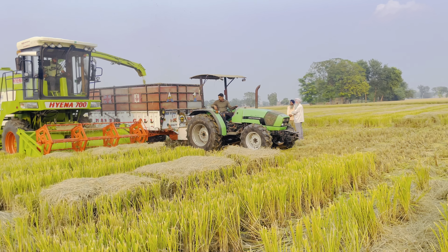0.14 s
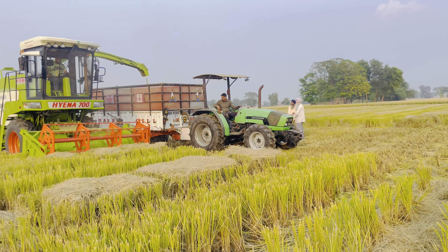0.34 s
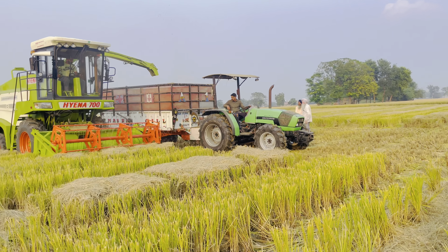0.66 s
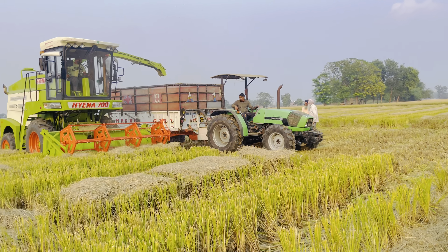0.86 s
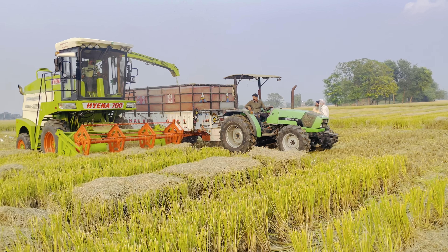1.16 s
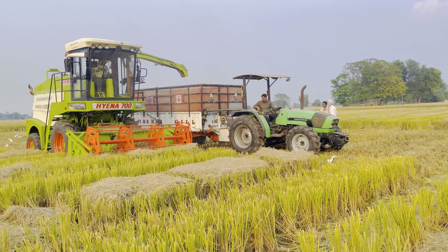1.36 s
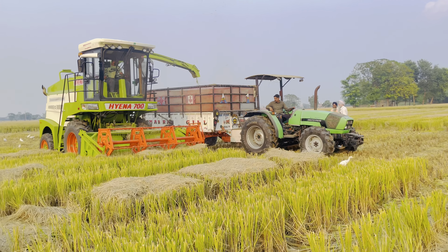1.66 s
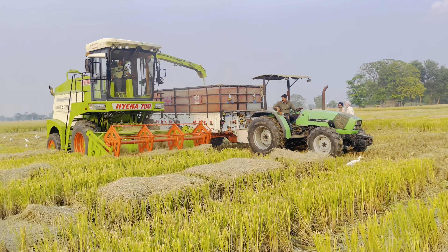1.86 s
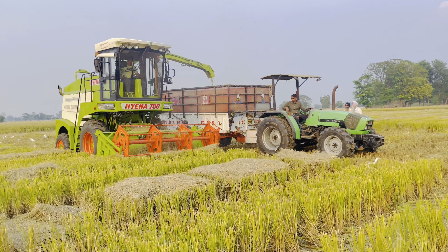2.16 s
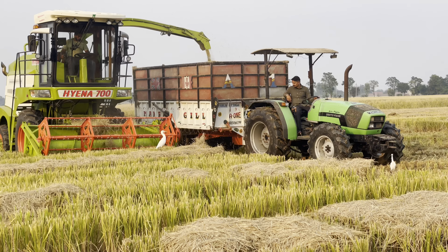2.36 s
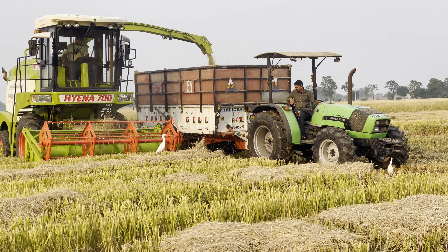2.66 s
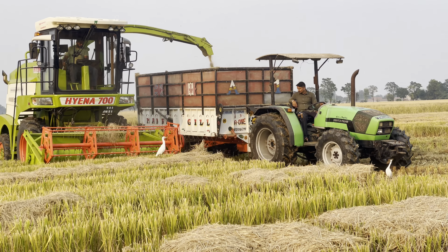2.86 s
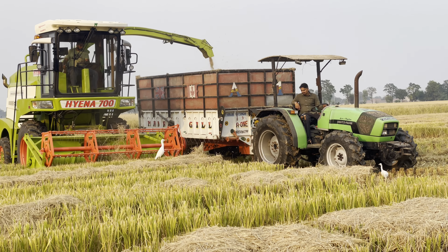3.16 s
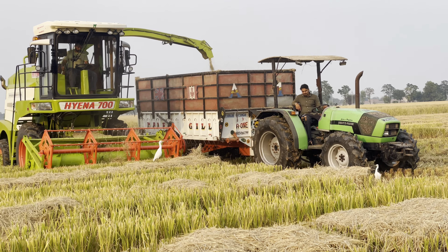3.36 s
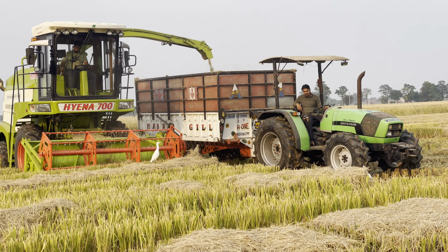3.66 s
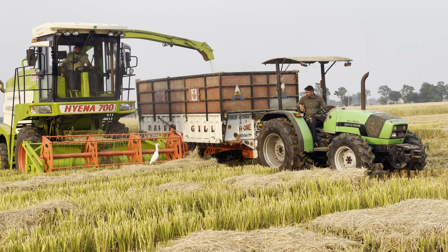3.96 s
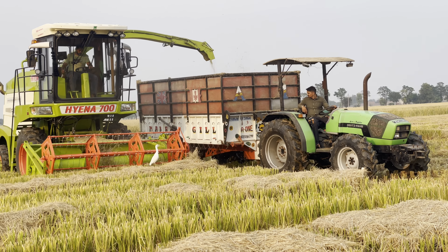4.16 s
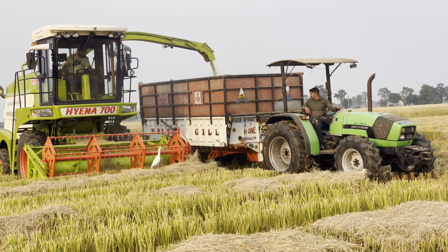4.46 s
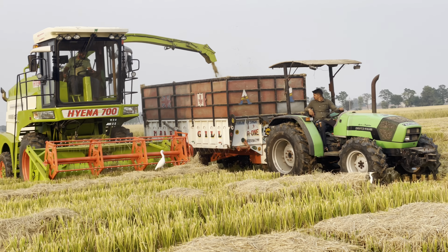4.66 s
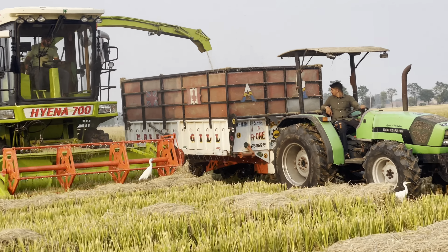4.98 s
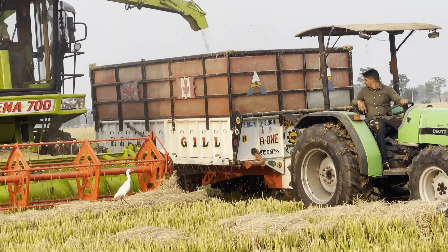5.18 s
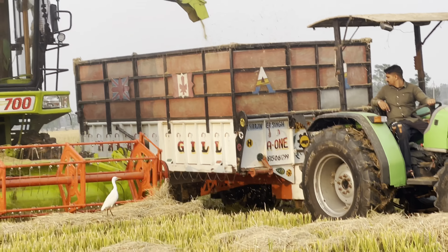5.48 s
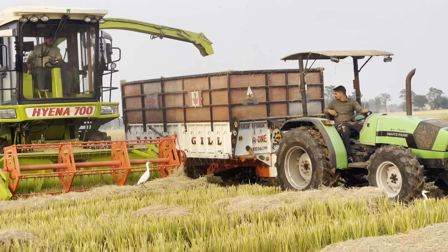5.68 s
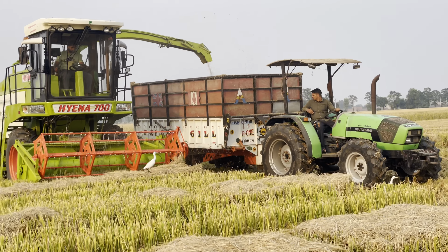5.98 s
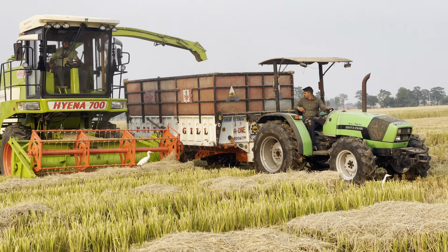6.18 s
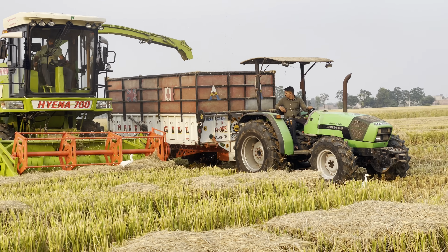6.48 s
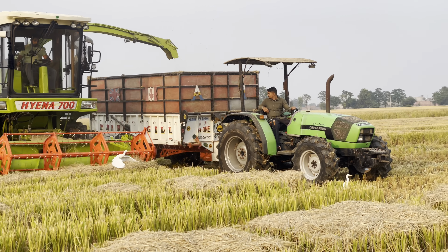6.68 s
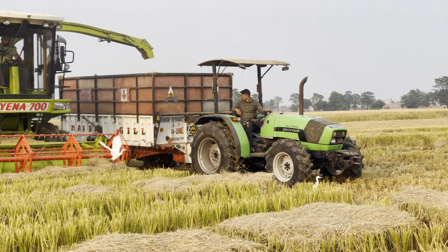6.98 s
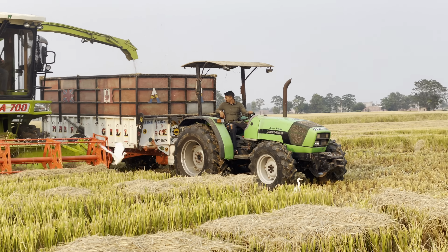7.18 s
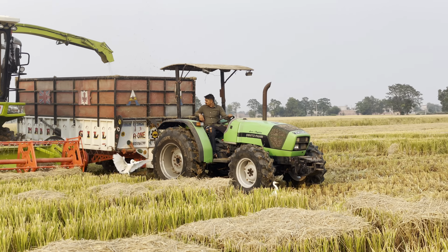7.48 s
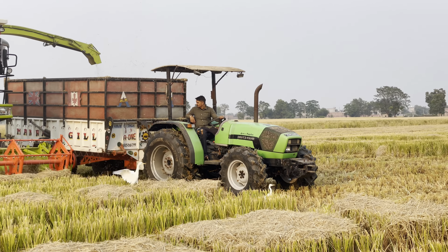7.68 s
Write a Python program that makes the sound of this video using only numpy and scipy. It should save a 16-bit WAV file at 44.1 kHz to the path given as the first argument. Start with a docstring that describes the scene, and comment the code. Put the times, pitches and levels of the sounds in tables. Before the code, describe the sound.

A forage harvester and tractor roar steadily in a field, humming and hissing with chopped straw, then jump nearer after about two seconds.

```python
"""A dense, humming, hissing roar: a forage harvester chops rice straw into a trailer that a tractor pulls.
One diesel drives chopper drum and fan, so their hums, sums of sines on one crank angle, rise and sag together.
Exhaust rumble, machine roar and rattle, and straw hiss are bands of shaped noise that throb, clump and swell.
At 2.34 s the listening place jumps nearer and more head-on; the sound starts low, then rises within 20 ms.
The machines then roll past."""
import sys
import numpy as np
from scipy import signal
from scipy.fft import rfft, irfft, next_fast_len
from scipy.io import wavfile
from scipy.ndimage import map_coordinates

SR = 44100
rng = np.random.default_rng(int(sys.argv[2]) if len(sys.argv) > 2 else 0)


def dump(signal):
    """Clip the signal to [-1, 1] and save it as 16-bit WAV at the path in sys.argv[1]."""
    limited = np.clip(np.atleast_2d(signal).T, -1, 1)
    pcm = np.round(limited * 32767).astype(np.int16)
    wavfile.write(sys.argv[1], SR, pcm)


N = 345303

# Engine speed, sagging under load and recovering. Each row: time in seconds, crank turns per second.
CRANK_SPEED = [(0, 34.09), (0.9, 34.21), (2.33, 34.21), (2.37, 33.82), (2.55, 33.85), (2.9, 34.0),
               (3.2, 34.0), (3.7, 34.19), (4.25, 34.14), (4.5, 34.07), (5.5, 34.04), (7.1, 34.38),
               (7.83, 34.36)]
# Steady partials of drum, fan and engine. Each row: multiple of the knife, blade or crank rate,
# level in dB from afar, level in dB approaching the near place, level in dB abreast of it.
DRUM_PARTIALS = [(3, -33.5, -39, -39), (5, -38, -35.5, -36.5), (6, -49, -50, -47), (7, -44, -45, -44),
                 (8, -49, -48, -48)]
FAN_PARTIALS = [(1, -28.5, -26.5, -27.5), (1.5, -40, -38.5, -45), (2, -40.5, -35.5, -29.5),
                (3, -47, -46, -42)]
ENGINE_PARTIALS = [(1, -45, -44, -43), (2, -41, -41, -40), (3, -38, -35, -33.5), (4, -36, -33, -34.5),
                   (20, -44, -38, -37.5), (27, -45, -46, -49), (28, -43, -44, -47), (29, -41, -47, -46),
                   (30, -40.5, -38, -37), (32, -49, -50, -46), (33, -52, -48, -45), (44, -51, -47, -45)]
# Whines of gears, belts and chains. Each row: multiple of the crank rate,
# level in dB from afar, level in dB approaching, level in dB abreast.
GEAR_WHINES = [(29.21, -49, -40, -45), (36.4, -49, -46, -41), (37.68, -48, -45, -48),
               (40.44, -48, -46, -45), (54.1, -52, -54, -46.5), (59.1, -54, -45.5, -53),
               (61.1, -50, -45.5, -53), (73.8, -57, -49, -48), (90.65, -62, -51, -49.5),
               (94.6, -52, -47, -45.5), (95.9, -52, -48, -47.5), (96.75, -62, -56, -46),
               (98.75, -58, -49, -47.5), (101.95, -55, -46, -46.5)]
# The leading hums: the drum's low thrum that comes and goes (once the knife rate), its main hum (twice),
# the whine an octave above that, and the diesel's strongest hum (ten times the crank rate).
# Each row: time in seconds, level in dB.
DRUM_THRUM = [(0, -41), (1.35, -39), (1.7, -26), (2.05, -28), (2.35, -30), (2.95, -39), (3.3, -33),
              (3.6, -32), (4.0, -35), (4.5, -39), (4.75, -35), (5.1, -25), (5.45, -25), (5.75, -28),
              (6.35, -27.5), (6.7, -21.5), (7.0, -24.5), (7.3, -38), (7.55, -28), (7.83, -34)]
DRUM_MAIN_HUM = [(0, -24.5), (0.4, -22.5), (0.55, -25.5), (0.8, -22.7), (1.27, -22.5), (1.43, -25),
                 (1.6, -22), (2.2, -22), (2.38, -27.5), (2.6, -22), (2.95, -26), (3.45, -24.5),
                 (4.0, -26.5), (4.4, -23.5), (4.75, -20.5), (4.95, -23), (5.25, -20.5), (5.6, -19),
                 (6.1, -19), (6.9, -22), (7.1, -26), (7.3, -21), (7.5, -23.5), (7.8, -20.5)]
DRUM_WHINE = [(0, -31), (0.6, -35.5), (1.6, -32), (1.9, -29), (2.28, -29), (2.42, -37), (3.1, -36),
              (3.6, -32), (4.3, -33.5), (4.85, -36), (5.15, -33), (5.45, -34.5), (5.9, -30.5), (6.2, -32.5),
              (6.6, -28.5), (7.05, -29), (7.25, -26.5), (7.8, -28)]
DIESEL_HUM = [(0, -41), (0.7, -35), (1.1, -41), (1.5, -35), (1.9, -38), (2.17, -27), (2.45, -33.5),
              (3.4, -25.5), (3.65, -29), (4.0, -28.5), (5.1, -30), (5.6, -26), (6.1, -28), (7.0, -24.5),
              (7.4, -24.5), (7.8, -29)]
# Exhaust boom, swelling as the engines take up load. Each row: time in seconds, level in dB.
EXHAUST_BOOM = [(0, -18), (0.35, -22), (0.7, -19.5), (1.0, -20.5), (1.55, -20.5), (2.05, -19),
                (2.45, -21.5), (2.9, -21), (3.35, -17.5), (3.85, -17.5), (4.03, -22), (4.5, -17),
                (4.8, -20), (5.1, -18), (5.5, -17), (5.95, -18), (6.3, -21), (6.6, -21), (7.25, -17.5),
                (7.75, -20)]
# Drone of the bodywork above the boom: level in dB from afar, approaching, abreast.
BODY_DRONE = (-21, -19.5, -19)
# Broad colour of the noise. Each row: frequency in Hz, far density in dB per Hz, near density in dB per Hz
# (only relative within a band: each band is levelled afterwards).
TIMBRE = [(22, -34.2, -32.9), (40, -15, -14.5), (70.5, -12.5, -5.5), (134, -1.5, 0.0), (250, -6, -6),
          (376, -12, -12), (474, -18.5, -16), (984, -20.5, -19.5), (1550, -25, -28.5), (2700, -30.5, -34),
          (4330, -31, -29), (7300, -39, -33.5), (11180, -38, -36), (15100, -57.5, -52.5)]
# Resonances of housing and spout. Each row: centre in Hz, width in Hz, far boost in dB, near boost in dB.
HOUSING = [(556, 42, 1.5, 4), (732, 205, 6, 2.5), (955, 167, 9, 6.5), (1300, 250, 7, 7),
           (1494, 45, 8.5, 4.5), (1936, 760, 6, 10), (2610, 390, 3, 7), (3225, 930, 10, 11.5),
           (2520, 160, -0.5, 2.5), (3670, 94, 2, 1.5), (4160, 150, 4, 0), (5050, 210, 7.5, 0.6),
           (5940, 180, 4.5, -0.5), (6500, 400, 5.5, 2.5), (6870, 180, 4, 1), (9880, 140, 11, 8)]
# Bands that the ground reflection cancels. Each row: centre in Hz, width in Hz, far gain in dB, near gain in dB.
GROUND_DIPS = [(82.4, 16, -1, -3.5), (197, 9, -9, -1), (630, 39, -2, 0), (1150, 95, -3, -3),
               (1590, 81, 0, -1), (2360, 140, -0.5, -1), (3070, 130, -0.5, -1.5), (5500, 310, -8, 0)]
# How the sound spreads over left and right in each listening place. Each row: frequency in Hz, left over right
# in dB, lead of the left in radians, likeness of the two # sides from 0 to 1.
STEREO_FAR = [(34, 1.3, 0.1, 1), (200, 3, 0.3, 1), (378, -1.3, 0.44, 1), (450, -6, 1.2, 0.92),
              (584, 5, 2.38, 0.93), (693, 15, 4.3, 0.83), (930, 3, 7.4, 0.95), (1100, -0.5, 8.3, 0.8),
              (1350, 12, 10.6, 0.17), (1540, -4, 8.9, 0.66), (1820, 0, 11.6, 0.67), (2050, 5, 13.4, 0.3),
              (2460, -6, 18.2, 0.56), (2590, -0.5, 20.9, 0.9), (3450, 4.5, 22.4, 0.62),
              (3820, 3.5, 26.5, 0.17), (5000, 5.5, 31.7, 0.36), (5800, 5.5, 32.9, 0.2), (7900, 3, 35, 0.05),
              (9400, 0, 34.6, 1), (10500, 0, 33.5, 0.76), (12600, 0, 31.5, 1)]
STEREO_NEAR = [(34, 0.7, 0.05, 0.98), (200, 1.65, 0.15, 0.99), (397, 0.3, 0.26, 0.98), (510, 0.5, 1, 0.94),
               (610, 5.5, 0.6, 1), (690, 8, 0.3, 0.97), (900, 3.2, 0.4, 0.98), (1040, 4, 0.8, 0.97),
               (1140, 7, 0.1, 0.87), (1300, 2, 0.23, 0.99), (1600, 3.5, 0, 0.95), (1850, -0.5, 0, 1),
               (2320, 0, 0.12, 0.99), (2900, 0.2, 0.66, 0.95), (5300, 0, 0.5, 0.9),
               (5660, -0.5, -1.5, 0.82), (6600, 0.5, -0.55, 0.8), (8680, -1, -3, 1),
               (12000, 0.5, -5.2, 0.8), (13000, 0, -7, 1)]
# Steady flow of crop, heard as roar and as hiss: level in dB from afar, approaching, abreast.
ROAR_FLOW = (-26, -24.5, -24.5)
HISS_FLOW = (-36.5, -34.5, -34)
# Uneven flow of crop: most rows swell roar and hiss; the first swells the hiss while the roar sinks,
# and at 2.64 s a thin patch lets only the hiss sink.
# Each row: middle in seconds, half length in seconds, change of roar in dB, change of hiss in dB.
WADS = [(0.015, 0.033, -1.5, 4.5), (2.455, 0.14, 3, 0.5), (2.64, 0.053, 0.3, -2), (2.85, 0.035, 1, 1),
        (3.6, 0.03, 0.5, 0), (3.95, 0.05, 1.5, 1.5), (3.11, 0.11, 2, 1.5), (4.424, 0.084, 1.8, 1),
        (4.477, 0.036, 5, 4), (5.6, .14, 2, 1.5), (7.197, .16, 1, 2), (7.564, 0.088, 1, 1.5)]
# Finest spray of chaff, the top treble. Each row: time in seconds, level in dB against the rest of the hiss.
SPRAY = [(0, -2), (0.25, -1.5), (1.1, 0.5), (1.6, 1), (2.18, -1), (2.3, 1.5), (2.6, -1), (3.4, 0),
         (4.4, 0.5), (5.14, -2), (5.9, -2), (6.3, -0.5), (7.0, 0.5), (7.4, 1), (7.83, 1)]
# Hard stalks that tick against the spout. Each row: start in seconds, level in dB over the finest spray.
STALKS = [(.119, 6), (.437, 5), (.518, 9.5), (.614, 7), (1.037, 7), (1.095, 8), (3.477, 5), (5.126, 3),
          (6.620, 8.5)]
# Lumps that knock through the chopper housing. Each row: start in seconds, decay in seconds,
# level in dB over the rattle, level in dB over the hiss.
KNOCKS = [(1.943, .011, 0, -20), (2.838, .028, 0.5, -14), (3.210, .012, 2, -20), (3.417, .01, -0.5, -20),
          (3.583, .018, 0.5, -16), (4.111, .009, 0, -20), (4.423, .012, -7, -7), (4.453, .014, -5, -7),
          (4.476, .018, -4, -7), (4.502, .016, -2, -8), (4.679, .01, 1, -20), (5.126, .032, -16, 4.5),
          (6.714, .01, -4, -20)]

KNIVES_PER_TURN, BLADES_PER_TURN = 5.4986, 8.1471   # per crank turn
ABREAST_S, PASSING_S = 4.8, 1   # when the machines come abreast of the near place, and how gradually
JUMP_S, HOLD_S, RISE_S, START_GAIN = 2.343, 0.007, 0.011, 0.38   # jump to the near place, and its low start


def from_db(db):
    """Decibels to gain."""
    return 10 ** (np.asarray(db) / 20)


def rms(x):
    """Root mean square."""
    return np.sqrt(np.mean(x ** 2) + 1e-20)


def seconds():
    """Time of every sample."""
    return np.arange(N) / SR


def in_time(rows):
    """A (time, value) curve, one value a sample."""
    s, values = np.transpose(rows)
    return np.interp(seconds(), s, values)


def at_hz(points, hz, axis):
    """One column of a spectrum, read on a log-frequency axis."""
    points = np.array(points, float)
    return np.interp(np.log(hz), np.log(np.maximum(points[:, 0], 1)), points[:, axis])


def bins():
    """Frequency in Hz of every bin of the filter grid."""
    size = next_fast_len(N, True)
    return np.maximum(np.arange(size // 2 + 1) * SR / size, 1)


def filtered(x, response):
    """Pass x through a frequency response."""
    size = next_fast_len(N, True)
    return irfft(rfft(x, size) * response, size)[..., :N]


def low_share(edge_hz):
    """Steep low-pass response whose gain is one half at the edge."""
    return 1 / (1 + (bins() / edge_hz) ** 12)


def crossover(x, edge_hz):
    """The parts of a sound below and above a frequency."""
    low = filtered(x, low_share(edge_hz))
    return low, x - low


def drift(rate):
    """Slow random wander of rms 1 that changes about rate times a second."""
    step = 40   # samples between the points that are drawn
    r = np.exp(-2 * np.pi * rate * step / SR)
    settle = 2000   # first points, dropped while the filter settles
    noise = rng.standard_normal(N // step + settle + 2)
    slow = signal.lfilter([1], [1, -2 * r, r * r], noise)[settle:]
    return np.interp(np.arange(N) / step, np.arange(len(slow)), slow / rms(slow))


def approach(far_db, near_db, abreast_db):
    """Level of a source: steady from afar, then easing to a new level as the machines come abreast."""
    t = seconds()
    passed = .5 + .5 * np.tanh((t - ABREAST_S) / PASSING_S)
    return np.where(t < JUMP_S, far_db, near_db + (abreast_db - near_db) * passed)


def nearing(partials):
    """Each partial with its level along the approach."""
    return [(multiple, approach(*levels)) for multiple, *levels in partials]


def crank_angle(flutter):
    """Running angle of the crank in radians, its speed fluttering by a small share."""
    turns_per_s = in_time(CRANK_SPEED)
    return 2 * np.pi * np.cumsum(turns_per_s * (1 + flutter * drift(7.84))) / SR


def hum(turn, partials, waver_db):
    """Harmonics of a rotor, each wavering in level on its way over the field."""
    total = 0
    for multiple, db in partials:
        gain = np.sqrt(2) * from_db(db + waver_db * drift(1.45))
        total = total + gain * np.sin(multiple * turn + rng.uniform(0, 2 * np.pi))
    return total


def whines(crank):
    """Gear, belt and chain whines: each slips a little in pitch and flickers in level."""
    slip_radians, flicker_db = 0.8, 2.2
    total = 0
    for multiple, db in nearing(GEAR_WHINES):
        gain = np.sqrt(2) * from_db(db + flicker_db * drift(3.3))
        phase = slip_radians * drift(2.0) + rng.uniform(0, 2 * np.pi)
        total = total + gain * np.sin(multiple * crank + phase)
    return total


def rotors(crank):
    """Clean hums of chopper drum, cooling fan and diesel, all geared to the crank."""
    knives, blades = KNIVES_PER_TURN * crank, BLADES_PER_TURN * crank
    drum_lead = [(1, in_time(DRUM_THRUM)), (2, in_time(DRUM_MAIN_HUM)), (4, in_time(DRUM_WHINE))]
    leading = hum(knives, drum_lead, waver_db=.2) + hum(crank, [(10, in_time(DIESEL_HUM))], waver_db=.3)
    drum = hum(knives, nearing(DRUM_PARTIALS), waver_db=1.0)
    fan = hum(blades, nearing(FAN_PARTIALS), waver_db=0.94)
    engine = hum(crank, nearing(ENGINE_PARTIALS), waver_db=1.5)
    return leading + drum + fan + engine + whines(crank)


def stereo(pair):
    """Left and right response to sound straight from the machines."""
    balance_db, lead = at_hz(pair, bins(), axis=1), at_hz(pair, bins(), axis=2)
    half = from_db(balance_db / 2) * np.exp(.5j * lead)
    both = np.array([half, 1 / half])
    return both / np.sqrt(np.mean(np.abs(both) ** 2, axis=0))


def clatter(crank, repeat_share):
    """White noise of which a part repeats every two crank turns, as valves and injectors do."""
    size = 2560   # points in one cycle
    cycle = rng.standard_normal(size)
    place = crank / (2 * 2 * np.pi) % 1 * size
    repeating = map_coordinates(cycle, [place], order=1, mode="grid-wrap")
    return np.sqrt(repeat_share) * repeating + np.sqrt(1 - repeat_share) * rng.standard_normal(N)


def turbulence(pair, crank, axis):
    """Stereo noise coloured by housing and ground: a direct part and a part scattered by the field."""
    hz = bins()
    colour_db = at_hz(TIMBRE, hz, axis=axis)
    for row in list(HOUSING) + list(GROUND_DIPS):
        centre_hz, width_hz = row[:2]
        colour_db = colour_db + row[axis + 1] / (1 + (2 * (hz - centre_hz) / width_hz) ** 2)
    alike = np.clip(at_hz(pair, hz, axis=3), 0, 1)
    response = from_db(colour_db) * stereo(pair)
    direct = filtered(clatter(crank, repeat_share=0.11), response * np.sqrt(alike))
    scattered = filtered(rng.standard_normal((2, N)), response * np.sqrt(1 - alike))
    return direct + scattered


def split(noise, low_hz, high_hz):
    """Bass, middle and treble of a noise, each of rms 1 in the centre."""
    bass, lower = low_share(low_hz), low_share(high_hz)
    parts = [filtered(noise, share) for share in (bass, lower - bass, 1 - lower)]
    return [part / rms(part.mean(axis=0)) for part in parts]


def exhaust(rumble, crank):
    """Exhaust boom and bodywork drone, throbbing gently at half, one and two times the crank rate."""
    boom, body = crossover(rumble, edge_hz=215)
    throb = 1 + 0.084 * np.cos(crank / 2) + .08 * np.cos(crank) + 0.057 * np.cos(2 * crank)
    return (from_db(in_time(EXHAUST_BOOM)) * boom + from_db(approach(*BODY_DRONE)) * body) * throb


def feed():
    """Levels in dB of chopper and hiss: each wad or thin patch of crop smoothly bends the steady flow."""
    t = seconds()
    chopper_db = approach(*ROAR_FLOW)
    hiss_db = approach(*HISS_FLOW) + 0.43 * drift(8.2)
    for middle_s, half_s, roar_change_db, hiss_change_db in WADS:
        bump = np.exp(-((t - middle_s) / half_s) ** 2)
        chopper_db = chopper_db + roar_change_db * bump
        hiss_db = hiss_db + hiss_change_db * bump
    return chopper_db, hiss_db


def chopper(middle, crank, chopper_db, rattle_gain):
    """Roar that beats with the knives, under the rattle and rasp of straw in the housing."""
    roar, rattle = crossover(middle, edge_hz=1300)
    rattle, rasp = crossover(rattle, edge_hz=2500)
    follows = 0.89   # share of a wad's level change that reaches the roar below the rattle
    roar_db = follows * chopper_db + (1 - follows) * approach(*ROAR_FLOW)
    # each knife, and each pair of strokes
    beat = 1 + 0.088 * np.cos(KNIVES_PER_TURN * crank) + 0.054 * np.cos(2 * crank)
    low = from_db(roar_db + 0.6 * drift(5)) * roar * beat
    high = rattle * rattle_gain + rasp * np.sqrt(rattle_gain)
    return low + from_db(chopper_db) * high


def chaff(treble, hiss_db, hiss_gain, spray_gain):
    """Hiss of chopped straw and, above it, the finest spray."""
    hiss, spray = crossover(treble, edge_hz=7400)
    return from_db(hiss_db) * (hiss * hiss_gain + spray * spray_gain)


def grains(clump_db, grain_db):
    """Gain of a stream of tiny impacts that come in clumps; rms 1."""
    flow = from_db(clump_db * drift(15) + grain_db * drift(160))
    return flow / rms(flow)


def strikes(blows):
    """Extra gain from blows (start s, decay s, dB): each jumps up and dies away."""
    t, gain = seconds(), np.zeros(N)
    for start_s, decay_s, db in blows:
        after = (t >= start_s) & (t < start_s + 10 * decay_s)
        gain[after] += from_db(db) * np.exp((start_s - t[after]) / decay_s)
    return gain


def straw():
    """Gains of rattle, hiss and spray: straw flies in clumps, hard stalks tick, lumps knock in the housing."""
    tick_s = .002   # decay of a stalk's tick
    ticks = strikes([(s, tick_s, db) for s, db in STALKS])
    rattle_knocks = strikes([(s, decay_s, db) for s, decay_s, db, _ in KNOCKS])
    hiss_knocks = strikes([(s, decay_s, db) for s, decay_s, _, db in KNOCKS])
    rattle = grains(clump_db=.8, grain_db=1.2) + rattle_knocks
    hiss = grains(clump_db=1.0, grain_db=.5) + hiss_knocks
    fine = np.sqrt(hiss) * grains(clump_db=0.94, grain_db=0.8)
    spray = from_db(in_time(SPRAY)) * (fine + ticks)
    return rattle, hiss, spray


def machinery(pair, crank, crop, axis):
    """All the noisy sources from one place: one coloured noise split into exhaust, chopper and chaff."""
    rumble, middle, treble = split(turbulence(pair, crank, axis=axis), low_hz=435, high_hz=3830)
    chopper_db, hiss_db = feed()
    rattle_gain, hiss_gain, spray_gain = crop
    chopping = chopper(middle, crank, chopper_db, rattle_gain)
    return exhaust(rumble, crank) + chopping + chaff(treble, hiss_db, hiss_gain, spray_gain)


def scene():
    """The same machines from two places: a jump to the near one, which starts low and quickly rises."""
    crank = crank_angle(flutter=.0002)
    tones, crop = rotors(crank), straw()
    far = machinery(STEREO_FAR, crank, crop, axis=1) + filtered(tones, stereo(STEREO_FAR))
    near = machinery(STEREO_NEAR, crank, crop, axis=2) + filtered(tones, stereo(STEREO_NEAR))
    # the far place ends within a millisecond; the near one holds low, then comes up
    since_jump = seconds() - JUMP_S
    fade_out = np.clip(-since_jump / .001, 0, 1)
    rise = np.clip((since_jump - HOLD_S) / RISE_S, 0, 1)
    fade_in = (START_GAIN + (1 - START_GAIN) * rise) * (1 - fade_out)
    return far * fade_out + near * fade_in


def record(dry):
    """Cut the deepest bass below 30 Hz and the top above 15.1 kHz."""
    dry = signal.sosfilt(signal.butter(8, 30, "high", fs=SR, output="sos"), dry)
    return signal.sosfilt(signal.ellip(10, .1, 90, 15100, fs=SR, output="sos"), dry)


dry = scene()
out = record(dry)
dump(out)
```